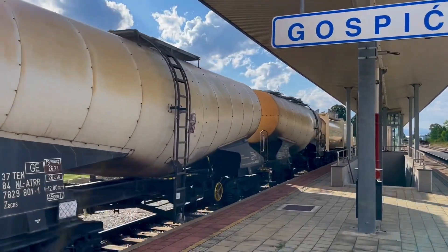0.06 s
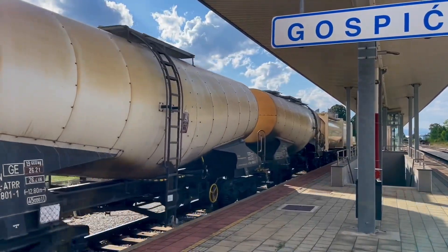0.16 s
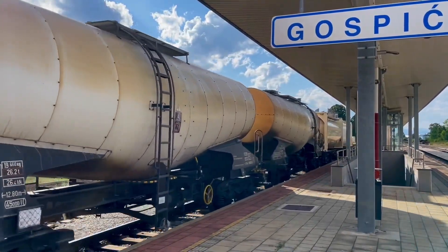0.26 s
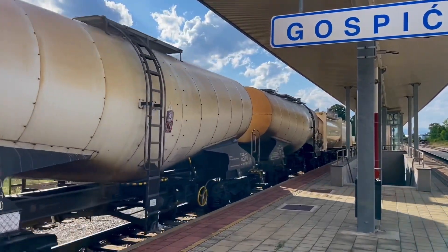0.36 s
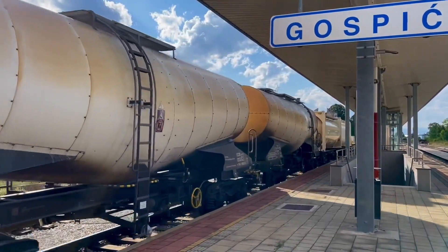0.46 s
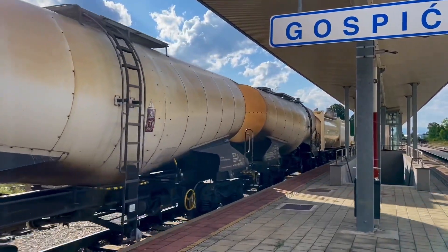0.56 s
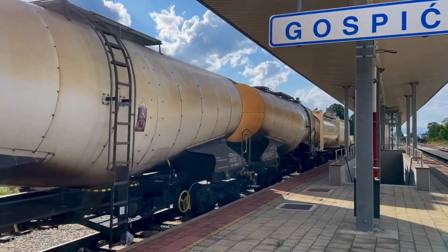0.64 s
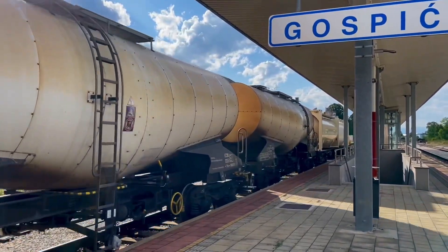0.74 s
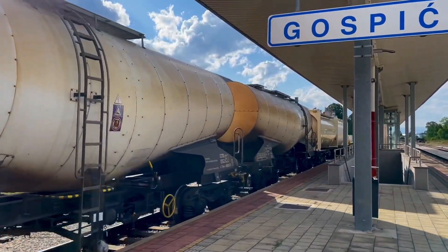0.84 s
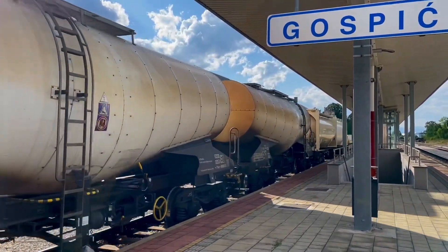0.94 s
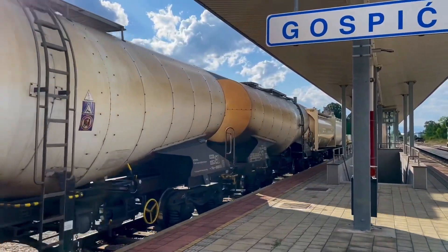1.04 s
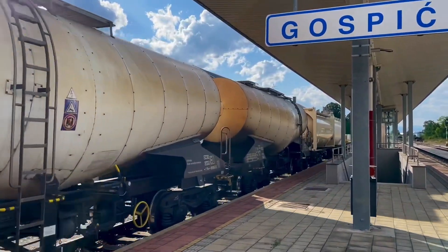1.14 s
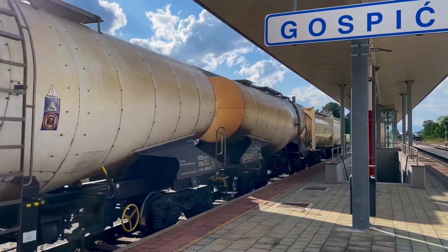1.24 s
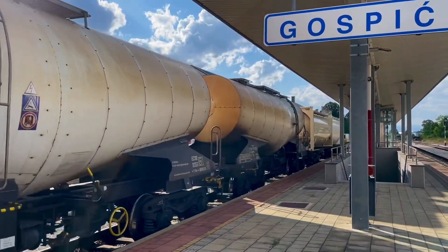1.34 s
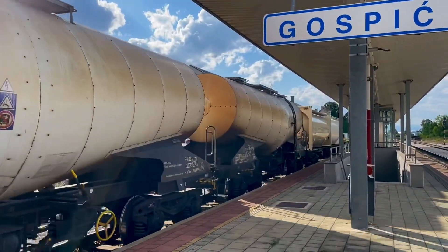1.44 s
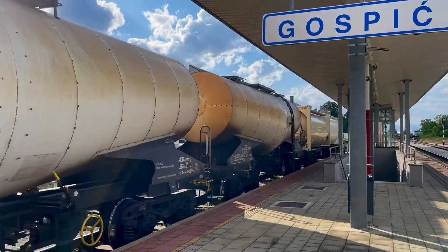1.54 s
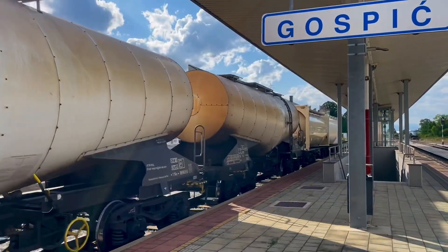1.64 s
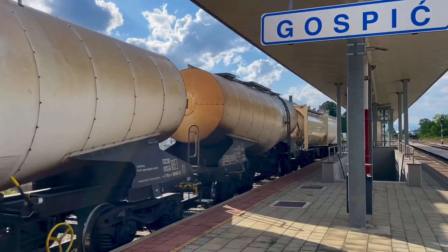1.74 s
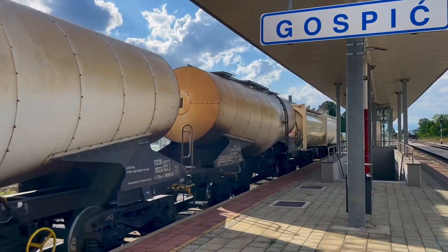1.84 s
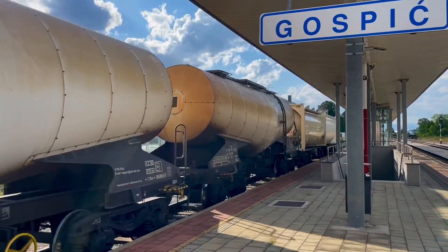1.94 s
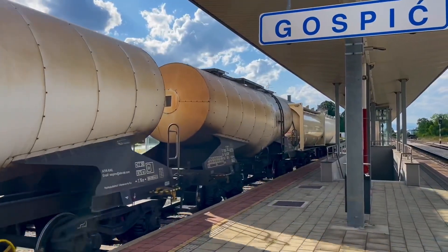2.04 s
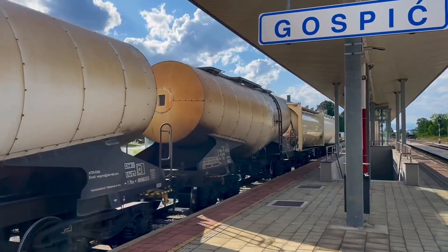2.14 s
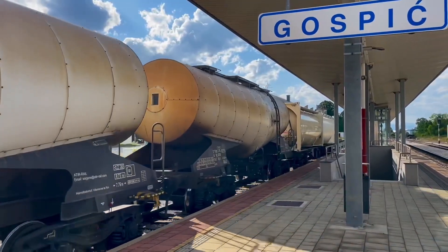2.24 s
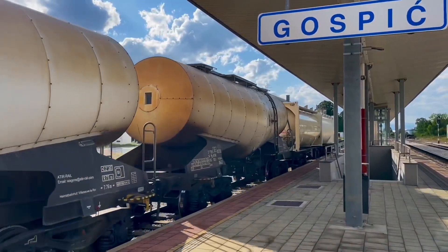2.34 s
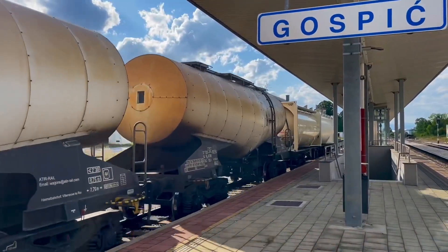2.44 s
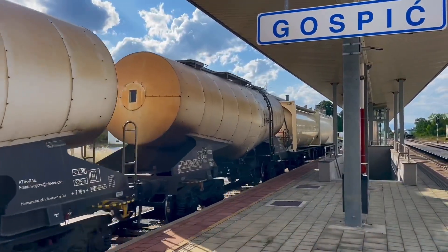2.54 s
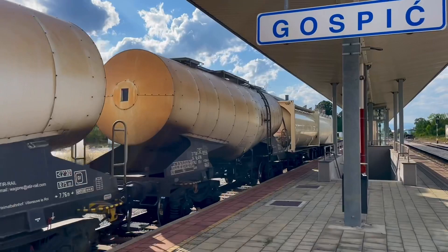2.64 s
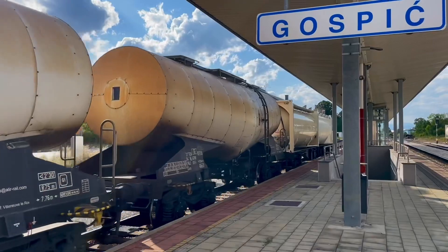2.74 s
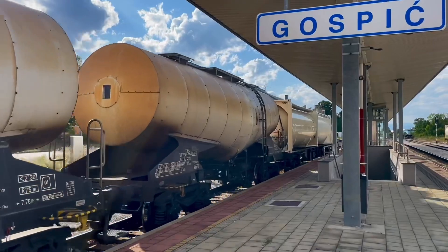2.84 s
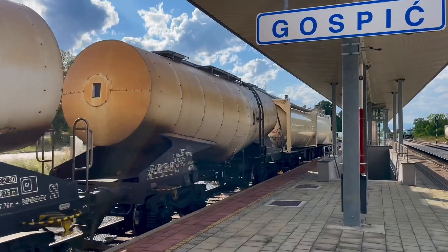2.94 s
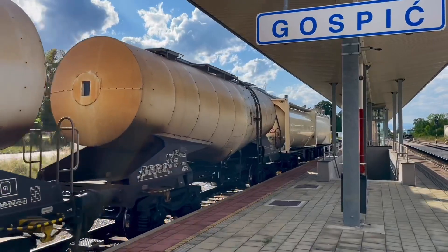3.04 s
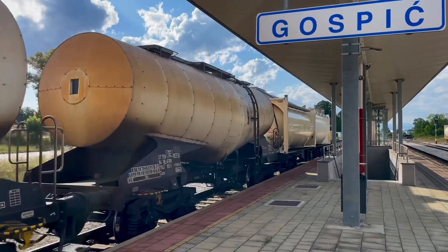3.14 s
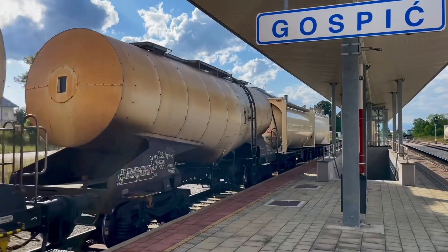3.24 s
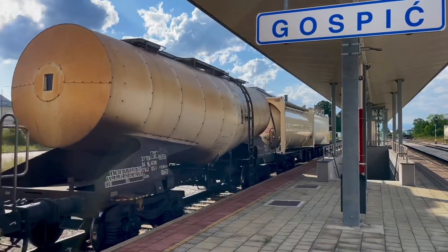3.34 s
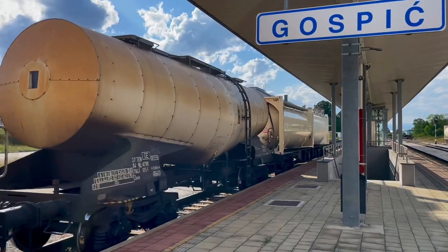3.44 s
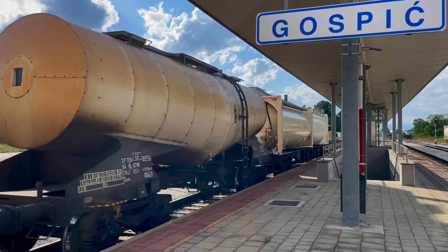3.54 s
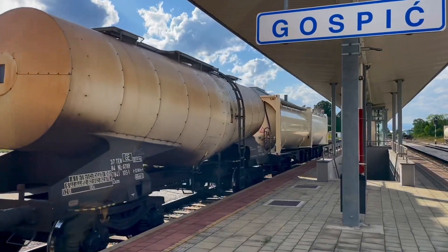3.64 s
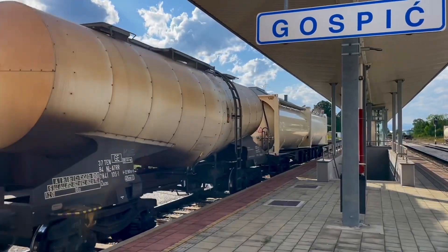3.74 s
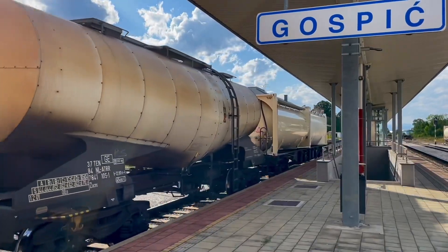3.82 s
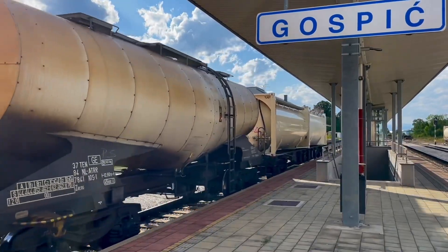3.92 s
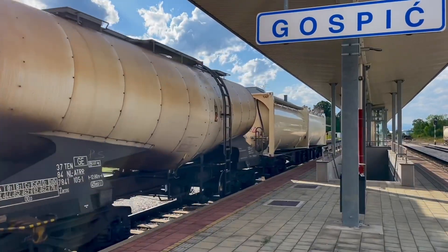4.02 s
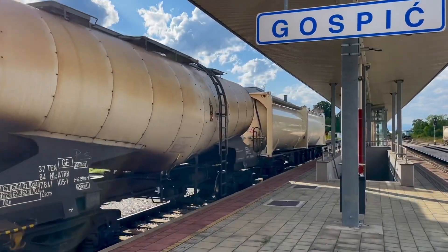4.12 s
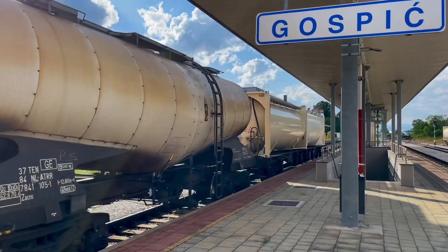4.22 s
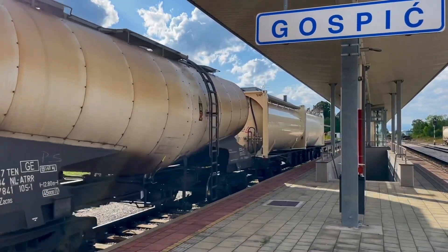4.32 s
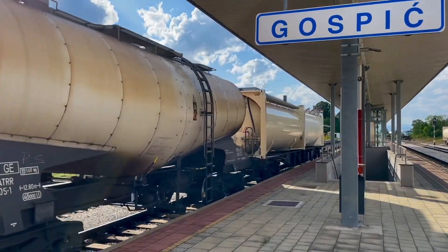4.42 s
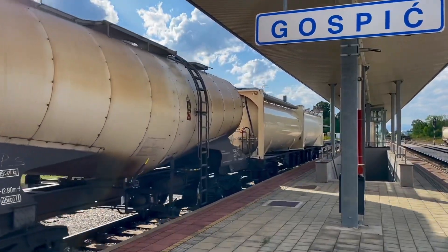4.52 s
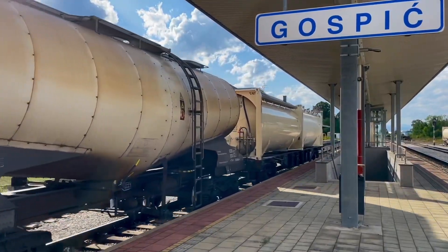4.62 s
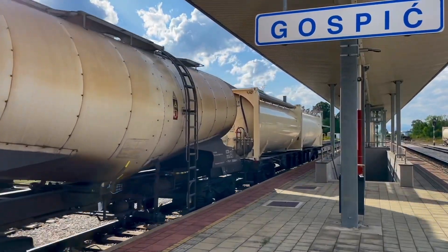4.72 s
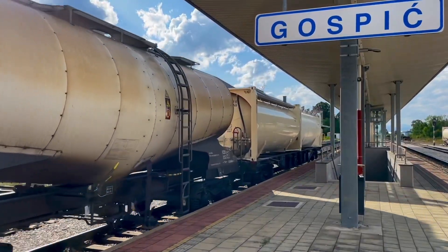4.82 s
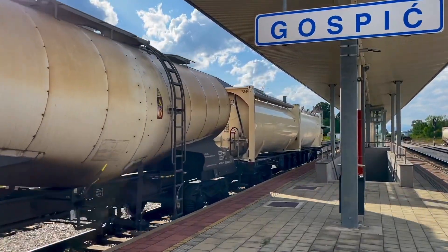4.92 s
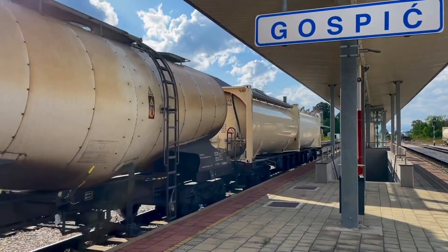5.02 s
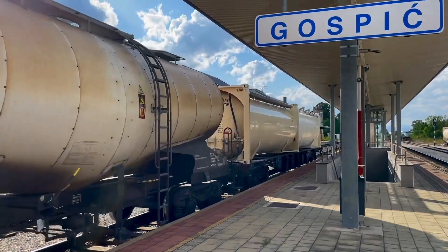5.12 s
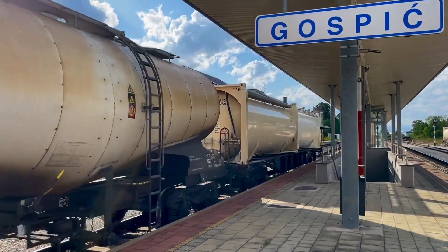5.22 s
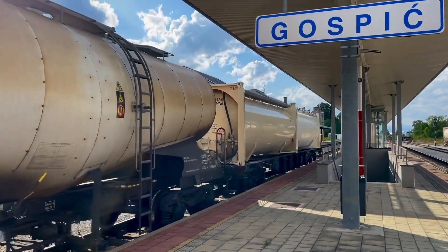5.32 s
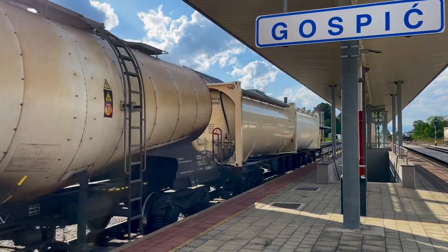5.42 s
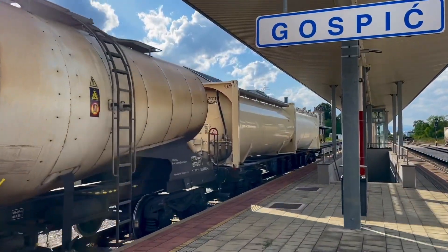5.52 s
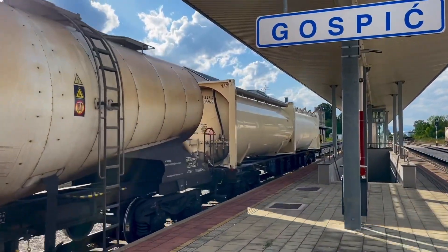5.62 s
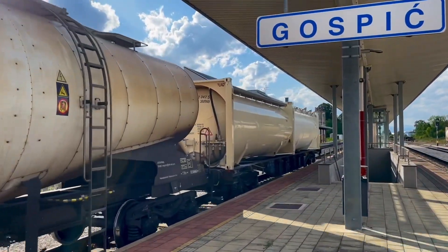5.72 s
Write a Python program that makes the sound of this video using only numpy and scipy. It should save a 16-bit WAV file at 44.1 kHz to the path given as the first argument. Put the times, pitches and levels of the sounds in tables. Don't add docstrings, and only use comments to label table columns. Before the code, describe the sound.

Close stereo view of a slow freight train at an outdoor platform. Quiet rolling rumble and light rattling lead into strong, irregular clunks from about one and a half seconds, with bright metallic chatter and short pings after them. Low thumps crowd the middle, a sharp jangling crash follows just after four seconds, then the rattle thins to rumble, small clinks and a thin broken squeak. Air puffs bump the microphones.

```python
import sys
import numpy as np
from scipy import signal
from scipy.fft import rfft, irfft, next_fast_len
from scipy.io import wavfile
from scipy.ndimage import uniform_filter1d, map_coordinates

SR = 44100
rng = np.random.default_rng(int(sys.argv[2]) if len(sys.argv) > 2 else 0)


def convert_level_to_amplitude(level_db):
    exponent = np.asarray(level_db, float) / 20
    return 10 ** exponent


def wav_out(sig):
    wavfile.write(sys.argv[1], SR, np.round(np.clip(np.atleast_2d(sig).T, -1, 1) * 32767).astype(np.int16))


N = 254456

# f/Hz, density/dB
FRAME_SPECTRUM = [(65, -15), (110, -1), (156, -6), (210, -4.5), (248, -2.5), (346, -6), (515, -6),
                  (546, -10), (672, -21), (800, -18), (1040, -24.5), (1760, -120)]
# f/Hz, density/dB
RAIL_SPECTRUM = [(320, -10), (550, -2), (678, -9), (1330, -9), (1440, -9.5), (1650, -10), (1870, -13),
                 (2170, -15), (2300, -11), (2990, -23.5), (5060, -120)]
# f/Hz, density/dB
RIGGING_SPECTRUM = [(1700, -8), (2100, -6), (2500, 1), (3100, 1.5), (3600, -2), (4500, -6), (5200, -5.5),
                    (6000, -10), (7000, -15), (8000, -20.5), (9500, -46)]
# f/Hz, density/dB
LINK_SPECTRUM = [(6500, -26), (7500, 2), (8500, -1.5), (10000, -3), (12000, -8), (14000, -7), (15650, -2.5),
                 (15800, -68)]
# f/Hz, width/Hz, level/dB
RIGGING_MODES = [(2420, 40, -2), (2568, 30, 0), (3000, 40, -2), (3180, 45, -3), (3815, 45, -6),
                 (4738, 30, -7), (5060, 45, -5), (5211, 40, -4), (5585, 50, -7), (6120, 40, -11)]
# t/s, tank level/dB, rail level/dB
AXLE_KNOCKS = [(1.502, -33.5, -40), (1.902, -16, -28.5), (2.514, -20, -31), (2.78, -40, -41),
               (3.272, -25, -57.5), (3.603, -18.5, -33), (4.201, -19.5, -30.5), (1.06, -53, -38),
               (.835, -53, -39), (1.148, -53, -41), (1.236, -53, -41), (.235, -47, -39), (.862, -50, -37),
               (4.65, -45, -40), (4.95, -36, -70)]
IDLE_DB = -51


def unit(x):
    return x / np.sqrt(np.mean(x ** 2) + 1e-20)


def along(points, hz):
    f, v = np.transpose(points)
    return np.interp(np.log(hz + 1), np.log(f + 1), v)


def wobble(rate):
    t = np.arange(0, N + 99, 64)
    knots = rng.standard_normal(int(N * rate / SR) + 4)
    return np.interp(np.arange(N), t, map_coordinates(knots, [t * rate / SR]))


def filtered(x, response):
    m = next_fast_len(N + SR // 4)
    return irfft(rfft(x, m) * response(np.fft.rfftfreq(m, 1 / SR)), m)[..., :N]


def summed(*levels_db):
    return 10 * np.log10(sum(convert_level_to_amplitude(db) ** 2 for db in levels_db))


def bouts(s, peak_db, rise, fall, rest_db):
    blunt = 0.25
    steps = np.arange(0, N + 32, 32)
    late = steps[:, None] / SR - s
    away = np.maximum(late / np.maximum(fall, .004), -late / np.maximum(rise, .004))
    lost_db = 20 * (np.hypot(away, blunt) - blunt)
    power = (convert_level_to_amplitude(peak_db - lost_db) ** 2).sum(1) + convert_level_to_amplitude(rest_db) ** 2
    return np.interp(np.arange(N), steps, 10 * np.log10(power))


def jolts(rate, spread_db, life):
    biggest = 2.5
    sizes = (rng.random(N) < rate / SR) * convert_level_to_amplitude(spread_db * np.minimum(rng.exponential(size=N), biggest))
    dying = np.exp(-np.arange(SR // 20) / (life * SR))
    power = np.abs(signal.fftconvolve(sizes ** 2, dying)[:N])
    return unit(np.sqrt(power / power.mean() + 0.75) * rng.standard_normal((2, N)))


def patchy(pair, depth_db, bins, frames):
    z = signal.stft(pair, nperseg=512)[2]
    field = uniform_filter1d(rng.standard_normal(z.shape[1:]), bins, 0)
    field = uniform_filter1d(field, frames, 1)
    return signal.istft(z * convert_level_to_amplitude(depth_db * unit(field)), nperseg=512)[1][:, :N]


def steadied(pair, span, share):
    level = np.sqrt(np.abs(uniform_filter1d(pair ** 2, int(span * SR), 1)) + 1e-3)
    return unit(pair / level ** share)


def rung(force, level, modes, turns_db):
    out = 0
    for hz, width, db in modes:
        drive = force * level * convert_level_to_amplitude(db + turns_db * np.tanh(wobble(9.8)))
        b, a = signal.iirpeak(hz, hz / width, SR)
        out = out + signal.lfilter(b, a, drive) * np.sqrt(SR / width / len(modes))
    return out


def steel(spectrum, level_db, modes, ring_db, rate, spread_db, patchy_db):
    force = jolts(rate, spread_db, life=0.0088)
    clatter = patchy(force, patchy_db, bins=2, frames=6)
    clatter = unit(filtered(clatter, lambda hz: convert_level_to_amplitude(along(spectrum, hz))))
    hard_db = level_db + 0.88 * (level_db - level_db.max())
    return convert_level_to_amplitude(level_db) * clatter + convert_level_to_amplitude(ring_db) * rung(force, convert_level_to_amplitude(hard_db), modes, turns_db=4.5)


def strike(rows, notes, attack, length):
    ring, burst = np.zeros((2, 2, N + SR))
    t = np.arange(int(length)) / SR
    ratio, side_db = np.transpose(notes)[:, :, None]
    for s, db, hz, t60, noise_db in rows:
        start, chance = round(s * SR), rng.random((2, len(notes), 1))
        fade = convert_level_to_amplitude(db - 60 * t / t60)
        sides = convert_level_to_amplitude(side_db) * np.sin(2 * np.pi * (hz * ratio * t + chance))
        cluster = np.sin(2 * np.pi * hz * t) + sides.sum(1)
        ring[:, start:start + len(t)] += fade * (1 - np.exp(-t / attack)) * cluster
        burst[:, start:start + len(t)] += fade * convert_level_to_amplitude(noise_db) * rng.standard_normal((2, len(t)))
    return ring[:, :N], burst[:, :N]


def frames_and_tanks():
    # t/s, level/dB
    drumming = [(0, -30), (.37, -35.5), (.56, -31.5), (.78, -33.5), (1.01, -30), (1.3, -33), (1.7, -30.5),
                (2.3, -32.5), (2.9, -29), (3.15, -38.5), (3.45, -32.5), (4.1, -30.5), (4.36, -34.5),
                (4.6, -33.5), (4.85, -39), (5.1, -42.5), (5.4, -37.5), (5.77, -36)]
    s, db = np.transpose(drumming)
    shaken_db = np.interp(np.arange(N) / SR, s, db)
    s, db, _ = np.transpose(AXLE_KNOCKS)
    rise = 0.022
    rap_db = bouts(s, db, rise, 0.051, -np.inf)
    boom_db = bouts(s, db - 8.5, rise, 0.35, -np.inf)
    frame = patchy(jolts(150, spread_db=1.5, life=0.0086), 1.16, bins=2, frames=7)
    frame = unit(filtered(frame, lambda hz: convert_level_to_amplitude(along(FRAME_SPECTRUM, hz))))
    return convert_level_to_amplitude(summed(shaken_db, rap_db, boom_db) - 1) * steadied(frame, 0.065, share=0.11)


def ground():
    # f/Hz, density/dB
    ground_spectrum = [(12, -43), (20, -31), (45, -2), (70, 4), (92, 1.5), (151, -9), (200, -12.5),
                       (260, -43), (440, -120)]
    # t/s, level/dB, time to lose 20 dB/s
    heaves = [(.14, -30, 0), (.56, -13, -0.1), (1.01, -33.5, 3.5), (1.17, -29, -1), (1.47, -27, -0.9),
              (1.69, -26, 1), (1.821, -18, -1.25), (1.94, -30, -0.5), (2.19, -24, 1), (2.54, -22.5, -0.1),
              (2.66, -28.5, 1.2), (2.79, -20.5, 0.4), (2.96, -18.5, 0.04), (3.12, -31.5, 1),
              (3.275, -15.5, 0.06), (3.39, -26.5, 0.6), (3.52, -24.5, 0.38), (3.63, -25, 0.19),
              (3.82, -22, 0), (4.19, -35, 0), (4.4, -36, 1.5), (4.71, -33.5, -0.04), (4.85, -38, 0.4),
              (5.008, -21, -0.16), (5.21, -33, 0), (5.45, -35.5, 3), (5.75, -25, -0.45)]
    s, db, fall = np.transpose(heaves)
    ground_db = bouts(s, db, 0.53 * fall, fall, rest_db=-50)
    rumble = jolts(120, spread_db=-3.5, life=0.028)
    rumble = unit(filtered(rumble, lambda hz: convert_level_to_amplitude(along(ground_spectrum, hz))))
    return convert_level_to_amplitude(ground_db - 2) * steadied(rumble, 0.23, share=0.27)


def shaking():
    # t/s, level/dB, rise/s, fall/s (each over 20 dB)
    shakes = [(0, -43.5, .05, 0.27), (.29, -44, 0.2, 0.18), (.56, -49.5, 0.24, 0.6),
              (1.16, -47.5, 0.074, 0.4), (1.3, -50.5, .15, 0.6), (.88, -42.5, 0.11, 0.18),
              (.95, -45, 0.14, 0.23), (1.54, -46, 0.043, 0.4), (1.9, -40, 0.016, 0.54),
              (2.009, -27, 0.14, 0.14), (2.06, -34.5, 0.12, 0.06), (2.44, -43.5, 0.2, 0.63),
              (2.545, -30.5, 0.019, 0.21), (2.619, -51, 0.13, 0.4), (2.931, -40, 0.027, 0.09),
              (3.34, -46.5, 0.45, -0.3), (3.601, -31, 0.0058, 0.03), (3.685, -31, 0.086, 0.14),
              (3.765, -39.5, 0.063, 0.1), (3.922, -41, 0.013, 0.4), (4.06, -40, 1, 0.25),
              (4.13, -41, 0.06, -3), (4.2, -42, 0.051, -0.5), (4.28, -28, 0.12, 0.1345),
              (4.34, -37, 0.1, -0.03), (4.48, -45.5, 0.049, .15), (4.599, -40, 0.025, 0.12),
              (4.678, -38, 0.079, 0.1), (4.98, -36, 0.14, 0.5), (5.1, -53, .2, -1.8),
              (5.272, -35.5, 0.18, 0.07), (5.415, -43.5, 0.08, 0.08), (5.74, -45.5, 0.068, 3)]
    return bouts(*np.transpose(shakes), IDLE_DB)


def rails(rattle_db):
    # f/Hz, width/Hz, level/dB
    rail_modes = [(1080, 40, -4), (1180, 40, -4), (1292, 40, -1), (1649, 35, 0)]
    s, _, db = np.transpose(AXLE_KNOCKS)
    following_db = -43 + 0.43 * (rattle_db - IDLE_DB)
    clang_db = summed(following_db, bouts(s - 0.011, db, 0.005, 0.21, -np.inf))
    return steel(RAIL_SPECTRUM, clang_db, rail_modes, ring_db=-11, rate=290, spread_db=1, patchy_db=2.6)


def rigging(rattle_db):
    return steel(RIGGING_SPECTRUM, rattle_db, RIGGING_MODES, ring_db=-9, rate=540, spread_db=3.2, patchy_db=2.5)


def chinks(rattle_db):
    count, level_db, spread_db, t60, detune = 700, -2, 12, 0.14, 0.02
    when, part, off, size, *phase = rng.random((6, count, 1))
    start, t = (when * N).astype(int), np.arange(SR // 12) / SR
    hz, _, part_db = np.transpose(RIGGING_MODES)[:, (part * len(RIGGING_MODES)).astype(int)]
    peak_db = rattle_db[start] + part_db + level_db - spread_db * size
    fade = convert_level_to_amplitude(peak_db - 60 * t / t60) * (1 - t / t[-1])
    at = (start + np.arange(len(t))).ravel()
    turns = hz * (1 + detune * (off - .5)) * t
    rings = [(fade * np.sin(2 * np.pi * (turns + p))).ravel() for p in phase]
    return np.array([np.bincount(at, ring, N + SR)[:N] for ring in rings])


def thin_links(rattle_db):
    # f/Hz, width/Hz, level/dB
    link_modes = [(8246, 25, 1), (8800, 17, 5), (12180, 24, -4), (15710, 30, 3)]
    # t/s, level/dB, time to lose 20 dB/s
    jingles = [(1.87, -74, 21), (1.97, -54, 0.32), (1.95, -49, 0.12), (2.04, -43, 0.12), (2.551, -52, 0.1),
               (2.94, -49, -0.54), (3.7, -50, -0.16), (4.282, -40, -0.3), (4.338, -44, -0.25),
               (4.9, -54.5, 0.16), (4.97, -49.5, 0.2), (5.06, -53, 0.22), (5.25, -54, 0.24),
               (5.74, -47, -0.06)]
    s, db, fall = np.transpose(jingles)
    sizzle_db = summed(rattle_db - 18.5, bouts(s, db, 0.21 * fall, fall, -np.inf))
    return steel(LINK_SPECTRUM, sizzle_db, link_modes, ring_db=-13, rate=630, spread_db=0.5, patchy_db=2)


def breeze():
    # f/Hz, density/dB
    buffet_spectrum = [(20, -33), (45, -7), (100, -3), (250, -7.5), (500, -24.5), (900, -33), (1600, -120)]
    # t/s, level/dB
    gusts = [
        (0, -41),
        (.93, -31),
        (1.6, -45),
        (2.68, -36),
        (3.2, -26),
        (3.7, -40),
        (4.1, -32),
        (4.68, -32),
        (5.43, -43),
    ]
    # t/s, level/dB, sharp edge level/dB
    puffs = [(1.036, -39, -12), (1.395, -34, -12), (1.481, -38, 2), (1.72, -25, -21), (2.663, -29, -16),
             (2.722, -24, -15), (2.795, -25, -19), (2.901, -21, -12), (3.002, -30, -9.5), (3.035, -32, -13),
             (3.08, -35, 0), (3.121, -28, -8), (3.225, -21, -14), (3.26, -21, -19), (3.389, -34, -25.5),
             (3.474, -29, -14), (3.574, -29, -16), (3.959, -30.5, -9), (4.05, -32, -14), (4.385, -66, 17.5),
             (4.812, -38, -2), (4.858, -37, -13.5), (5.048, -35, -10), (5.411, -37, -3)]
    buffet_db = bouts(*np.transpose(gusts), rise=0.28, fall=0.45, rest_db=-71)
    lumps = convert_level_to_amplitude(8 * np.tanh(wobble(30))) * rng.standard_normal((2, N))
    across, common = unit(filtered(lumps, lambda hz: convert_level_to_amplitude(along(buffet_spectrum, hz))))
    eddies, t = np.zeros(N + SR), np.arange(-SR // 20, SR // 20) / SR
    for s, db, edge_db in puffs:
        pitch, phase = rng.random(2)
        swell = np.exp(-(t / 0.025) ** 2) * np.sin(2 * np.pi * ((75 + 45 * pitch) * t + phase))
        plop = np.sin(2 * np.pi * (340 * t - 6000 * t * t + phase))
        edge = convert_level_to_amplitude(edge_db + 13) * np.exp(-(t / 0.0069) ** 2) * plop
        eddies[round(s * SR):][:len(t)] += convert_level_to_amplitude(db) * (swell + edge)
    push = convert_level_to_amplitude(buffet_db - 1.5) * across + eddies[SR // 20:][:N]
    return np.array([push, -push]) + convert_level_to_amplitude(buffet_db - 8.5) * common


def ticks():
    # t/s, level/dB, T60/s
    snap_events = [(1.8632, -53, .06), (1.929, -55.5, 0.088), (1.949, -49, .1), (2.3526, -55.5, 0.087),
                   (2.5384, -38, 0.076), (2.93, -47.5, 0.087), (3.5977, -47, 0.04), (3.6277, -52, .08),
                   (3.921, -57, 0.073), (4.1749, -53, .06), (4.2413, -48, .08), (4.2697, -30.5, 0.26),
                   (4.5984, -56, .06), (4.6448, -49, .08), (4.8554, -49, 0.04), (4.8993, -54, .08),
                   (5.1924, -47, .06), (.843, -60, 0.087), (.8964, -53, .08)]
    snaps, t = np.zeros((3, N + SR)), np.arange(SR // 5) / SR
    for s, db, t60 in snap_events:
        pair = convert_level_to_amplitude(db - 60 * t / t60) * rng.standard_normal((2, len(t)))
        front = pair[1] * convert_level_to_amplitude(-60 * t / 0.035)
        snaps[:, round(s * SR):][:, :len(t)] += np.vstack([pair, front])
    colour = lambda hz: convert_level_to_amplitude(along(LINK_SPECTRUM, hz) + 8) + convert_level_to_amplitude(along(RIGGING_SPECTRUM, hz) + 1)
    return filtered(snaps[:, :N], colour)


def pings():
    # t/s, level/dB, f/Hz, T60/s
    part_rings = [(1.91, -29, 2425, 0.15), (1.936, -28, 1394, 0.17), (1.942, -29, 3740, 0.11),
                  (1.944, -36, 5404, 0.15), (1.95, -32, 5060, 0.17), (1.976, -32, 3800, 0.15),
                  (1.983, -23, 2551, 0.12), (1.988, -28, 4748, 0.15), (1.994, -33, 5800, 0.32),
                  (2.018, -38, 5114, 0.15), (2.04, -28, 3036, 0.15), (2.066, -35, 5577, 0.13),
                  (2.075, -28, 2573, 0.15), (2.502, -34, 2347, 0.19), (2.504, -26.5, 1152, 0.22),
                  (2.528, -25.5, 1656, 0.15), (2.543, -29, 5230, 0.13), (2.551, -33, 3930, 0.15),
                  (2.557, -29, 2520, 0.15), (2.57, -29, 1650, 0.12), (2.584, -28, 3910, 0.15),
                  (2.589, -35, 5297, 0.16), (2.635, -37, 5240, 0.17), (3.59, -24.5, 1304, 0.097),
                  (3.599, -30, 3811, 0.06), (3.598, -28, 3050, 0.1), (3.599, -33, 5850, .12),
                  (3.613, -29.5, 2740, 0.15), (3.642, -37, 5150, 0.13), (3.66, -41, 2497, 0.14),
                  (3.674, -23.5, 3100, 0.2), (3.677, -32, 5135, 0.15), (3.738, -30.5, 2595, 0.19),
                  (3.77, -34, 2580, 0.15), (4.185, -27, 1072, 0.22), (4.203, -26, 1291, 0.11),
                  (4.24, -31, 5160, 0.06), (4.25, -30, 2480, 0.085), (4.27, -24, 2960, 0.15),
                  (4.272, -30, 1570, 0.15), (4.272, -24.5, 5060, 0.09), (4.284, -28, 4640, 0.17),
                  (4.292, -26, 3170, 0.15), (4.295, -29, 3843, 0.095), (4.296, -28, 5555, 0.12),
                  (4.298, -39, 2350, 0.11), (4.31, -34, 6020, 0.15), (4.33, -36, 5320, 0.08),
                  (4.341, -36, 5650, 0.07), (.885, -36, 3150, .1), (.9, -42, 5100, .1),
                  (5.397, -38, 2620, .1), (2.21, -43, 5400, .3), (4.964, -30, 1477, 0.2),
                  (4.977, -31.5, 2340, 0.25)]
    # t/s, level/dB, f/Hz, T60/s
    link_rings = [(1.982, -54, 11907, 0.15), (1.988, -48, 11229, 0.15), (2.005, -39, 10605, 0.2),
                  (2.008, -53, 12812, 0.15), (2.023, -44, 12112, 0.15), (2.043, -48, 8462, 0.15),
                  (2.055, -38, 9226, 0.2), (2.124, -60, 8494, 0.15), (2.548, -44, 9270, 0.15),
                  (2.551, -52, 11735, 0.15), (3.593, -61, 8365, 0.15), (3.639, -61, 12736, 0.15),
                  (3.683, -41, 9076, 0.15), (4.263, -39, 12919, 0.15), (4.272, -35.5, 8257, 0.15),
                  (4.278, -42, 12198, 0.15), (4.298, -55, 11455, 0.15), (4.298, -54, 10874, 0.15),
                  (4.301, -27, 8785, 0.15), (4.307, -49, 10034, 0.17), (4.33, -50, 11391, 0.17),
                  (4.934, -58, 8333, 0.15), (5.285, -63, 12661, 0.15)]
    out, t = np.zeros((2, N + SR)), np.arange(SR // 6) / SR
    onset = (1 - np.exp(-t / 0.002)) * (1 - t / t[-1])
    for s, db, hz, t60 in part_rings + link_rings:
        beat = 1 + 0.6 * np.cos(2 * np.pi * 0.018 * hz * t)
        fade = convert_level_to_amplitude(db + 1 - 60 * t / t60) * onset * beat
        direct, scattered = np.sin(2 * np.pi * hz * t), 0.27 * np.cos(2 * np.pi * hz * t)
        out[:, round(s * SR):][:, :len(t)] += fade * np.array([direct, scattered])
    return out[:, :N]


def joints():
    # t/s, level/dB, f/Hz, T60/s, clang level/dB
    drops = [(1.265, -18, 309, 0.065, -25), (1.474, -2, 202, 0.067, -39), (1.88, -6.5, 368, 0.074, -24),
             (1.891, -2, 66, 0.22, -33.5), (1.909, -7.5, 75.7, 0.39, -24), (2.502, -23, 118, 0.021, -5),
             (2.767, -6, 106, 0.13, -28), (2.958, 3, 77, 0.095, -34), (3.169, -5.5, 70.4, 0.42, -29),
             (3.268, 2, 63.4, 0.14, -43), (3.388, -2.5, 91, 0.1, -22), (3.479, -3, 73.7, 0.36, -32),
             (3.596, -4, 248, 0.1, -40.5), (3.818, -37, 74, 0.072, -18), (4.187, -5.5, 166, 0.13, -30),
             (4.209, -14.5, 151, 0.36, -20), (4.316, -13, 240, 0.075, -25), (4.358, -11, 277, 0.089, -36),
             (4.394, -11, 177, .06, -35), (4.415, -9, 330, 0.059, -26), (4.462, -6, 304, 0.052, -30),
             (4.502, -12, 197, 0.059, -30), (1.5, 0, 223, 0.036, -35), (4.85, -2.5, 202, 0.047, -15),
             (1.9065, 7, 91, 0.072, -40), (2.503, -6.5, 264, 0.066, -35), (3.603, -2, 224, 0.055, -40),
             (3.586, -5, 298, 0.058, -37), (2.504, -6.5, 515, 0.063, -35), (3.272, -3, 258, 0.078, -40)]
    thud, clang = strike(drops, [(.72, -13), (1.45, -8)], attack=0.0046, length=SR // 2)
    colour = lambda hz: convert_level_to_amplitude(along(RAIL_SPECTRUM, hz) - 13) + convert_level_to_amplitude(along(FRAME_SPECTRUM, hz) - 5)
    return convert_level_to_amplitude(-9.5) * thud + filtered(clang, colour)


def clinks():
    # t/s, level/dB, main ring f/Hz, T60/s, tick level/dB
    slaps = [(1.8915, -14, 2340, 0.16, -31), (1.9504, -19, 5050, 0.19, -14), (1.9882, -6, 2350, 0.049, -23),
             (2.505, -27, 1690, 0.29, -42), (2.5426, -19, 5210, 0.37, -7), (3.5992, -27, 3050, 0.047, -23),
             (3.6642, -19, 3160, 0.1, -33), (3.9218, -18.5, 2590, 0.23, -25),
             (4.1016, -21, 2536, 0.33, -22), (4.2745, -29, 2960, 0.13, -20),
             (4.6493, -18, 2390, 0.081, -36.5), (4.649, -20, 1456, 0.16, -40), (5.62, -23, 1330, 0.24, -41),
             (2.505, -9, 585, 0.089, -37), (3.5945, -18, 930, .06, -29), (4.9678, -28, 2375, 0.19, -26.5),
             (5.126, -21, 3230, 0.08, -28), (5.238, -19, 3100, 0.057, -28)]
    partials = [(.6, -2), (.81, -7), (1.03, -3.5), (1.21, -4)]
    ring, tick = strike(slaps, partials, attack=0.00037, length=SR // 3)
    colour = lambda hz: convert_level_to_amplitude(along(LINK_SPECTRUM, hz) - 6) + convert_level_to_amplitude(along(RIGGING_SPECTRUM, hz) - 12)
    return convert_level_to_amplitude(-17.5) * ring + filtered(tick, colour)


def bumps():
    # t/s, level/dB, f/Hz
    rebounds = [
        (4.326, -16.5, 220),
        (4.368, -15.5, 260),
        (4.401, -22, 170),
        (4.427, -21, 320),
        (4.472, -24, 300),
        (4.51, -21, 170),
        (4.705, -27, 150),
        (4.855, -30, 330),
    ]
    out, t = np.zeros(N + SR), np.arange(-SR // 20, SR // 20) / SR
    for s, db, hz in rebounds:
        lump = convert_level_to_amplitude(db) * np.exp(-(t / 0.007) ** 2) * np.cos(2 * np.pi * hz * t)
        out[round(s * SR):][:len(t)] += lump
    return np.array([out[SR // 20:][:N], np.zeros(N)])


def squeal():
    # start t/s, end t/s, f/Hz, level/dB
    flange_note = (5.45, 5.69, 2780, -50)
    start, end, hz, db = flange_note
    t = np.arange(N) / SR
    note = np.sin(2 * np.pi * np.cumsum(hz + 28 * wobble(60)) / SR)
    return convert_level_to_amplitude(db - 3 + 6.4 * np.tanh(wobble(25))) * ((t > start) & (t < end)) * note


def scene():
    # f/Hz, likeness
    alike_low = [(60, 0.98), (250, 1), (500, 1), (700, 0.62), (1000, 0.92), (1800, 1), (2300, 0.67),
                 (2900, 0.45), (3700, 0.98), (4500, 0.092), (5100, 1), (6300, 0.34)]
    # f/Hz, likeness
    alike_high = [(6950, .98), (7700, .995), (8100, .985), (8500, .94), (9000, .8), (9700, .7),
                  (10300, .97), (11000, .99), (11900, .85), (12700, .6), (13250, .998), (14800, .99),
                  (15300, .72)]
    # f/Hz, phase/rad
    lead_low = [(60, 0.21), (600, -0.62), (860, 0.27), (1400, 0.49), (2600, 0.57), (3100, 1.56),
                (3700, 1.1), (4400, -0.78), (4900, -0.39), (5500, -0.64), (6300, 1.5)]
    # f/Hz, phase/half turns
    lead_high = [(6950, 1), (8300, 1), (8800, 1.1), (9700, 1.75), (10200, 2), (12200, 2), (13250, 3),
                 (14900, 3), (15600, 3.15)]
    # f/Hz, level/dB
    left_excess = [(60, 0.5), (200, -1), (380, 4), (700, -0.5), (1290, 3.5), (2000, -1), (3000, 0.5),
                   (4400, 0.5), (5300, 1), (6000, 0.5)]

    def share(hz):
        turn = np.arccos(np.clip(along(alike_low + alike_high, hz), -1, 1)) / 2
        return np.array([np.cos(turn), np.sin(turn)])

    lead = lead_low + [(hz, np.pi * turns) for hz, turns in lead_high]
    half = np.array([[.5], [-.5]])

    def port_response(hz):
        tilt = convert_level_to_amplitude(half * along(left_excess, hz) * (hz < alike_high[0][0]))
        return tilt * np.exp(1j * half * along(lead, hz))

    rattle_db = shaking()
    rolling = frames_and_tanks() + ground()
    rattling = rails(rattle_db) + rigging(rattle_db) + chinks(rattle_db) + thin_links(rattle_db)
    wind, snaps = breeze(), ticks()
    blows = snaps[:2] + pings() + joints() + clinks() + bumps()
    direct, scattered = filtered(rolling + rattling + blows + squeal(), share)
    ports = np.array([direct + scattered, direct - scattered])
    return filtered(ports, port_response) + convert_level_to_amplitude(-9) * snaps[2] + wind


def low_pass(x):
    return signal.sosfilt(signal.butter(12, 15830, fs=SR, output="sos"), x)


def record(dry):
    cut = signal.butter(3, 34, "highpass", fs=SR, output="sos")
    mix = signal.sosfilt(cut, dry)
    return low_pass(mix)


dry = scene()
out = record(dry)
wav_out(out)
```